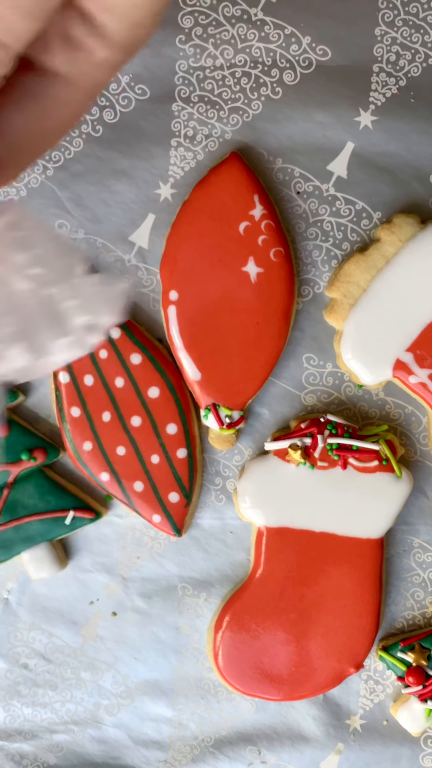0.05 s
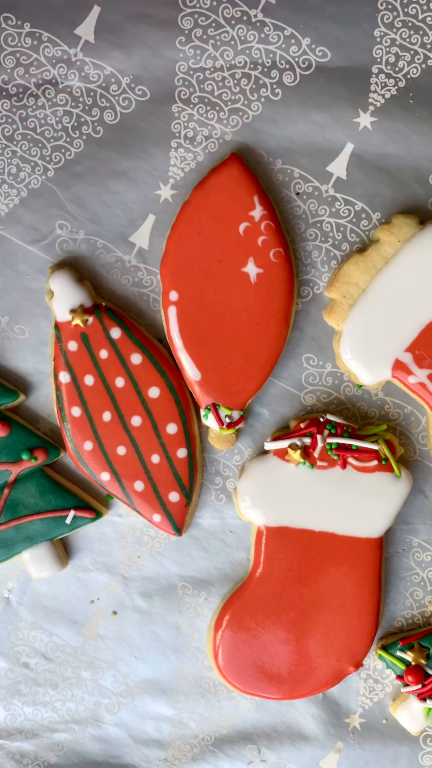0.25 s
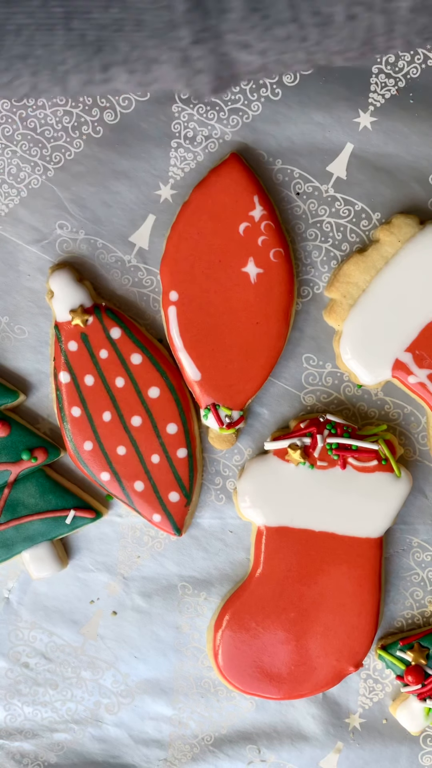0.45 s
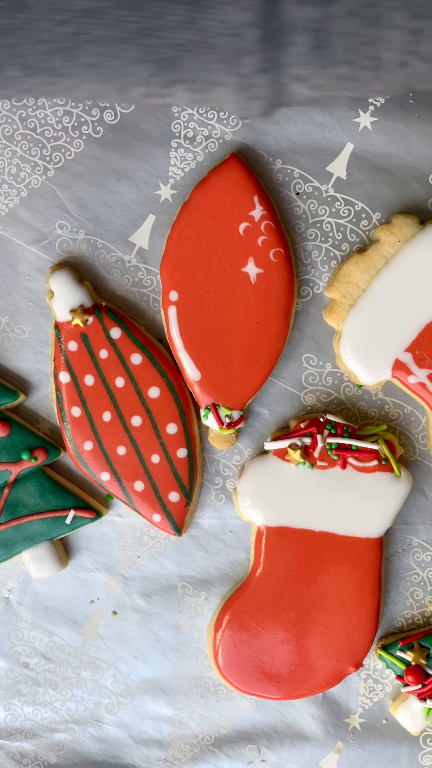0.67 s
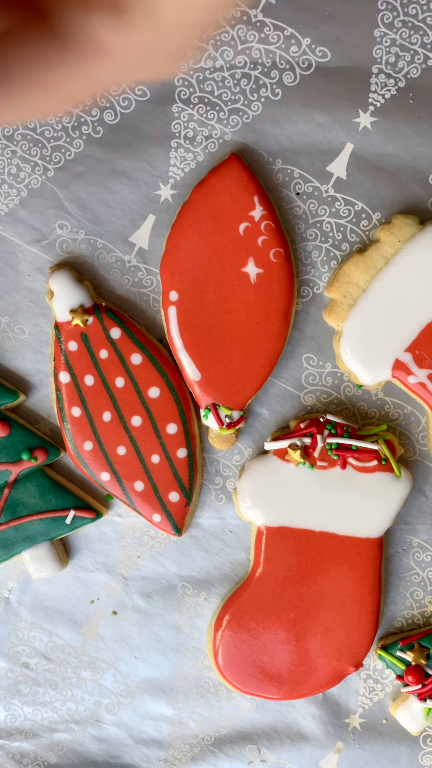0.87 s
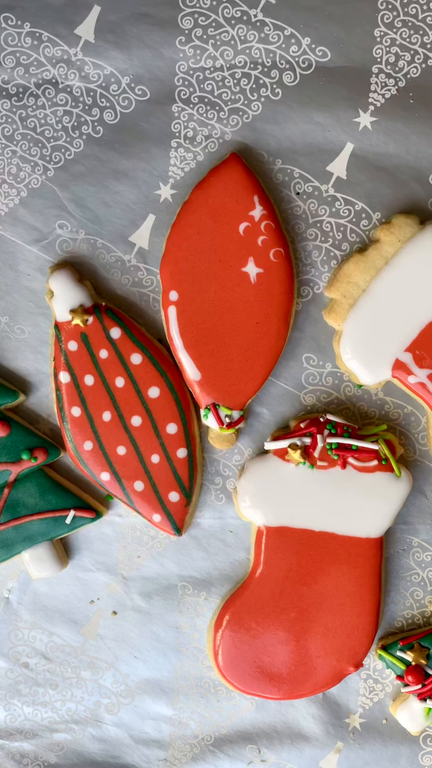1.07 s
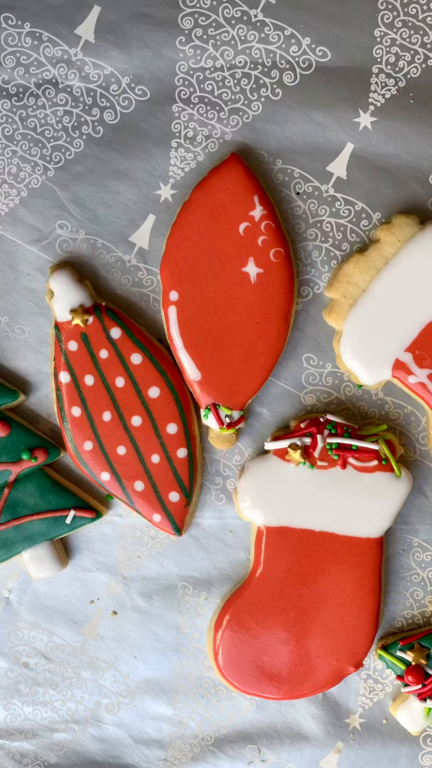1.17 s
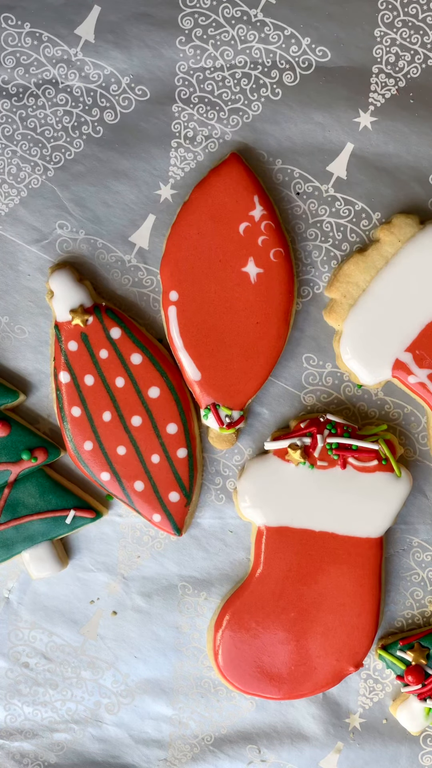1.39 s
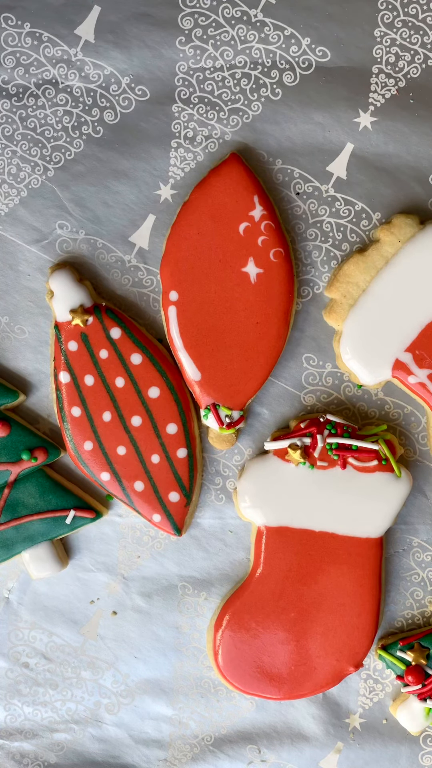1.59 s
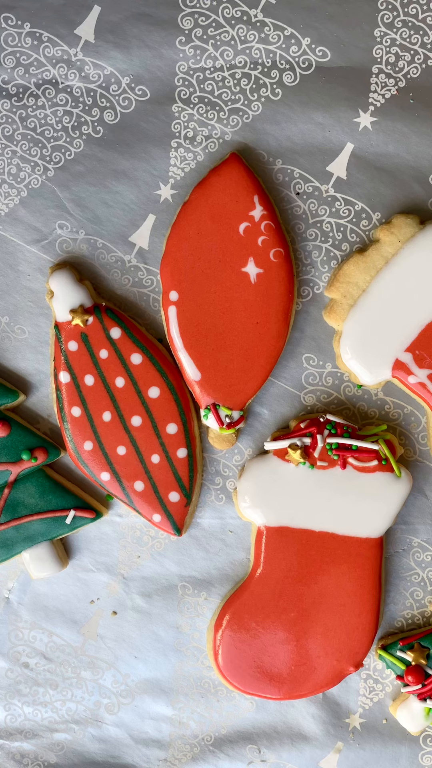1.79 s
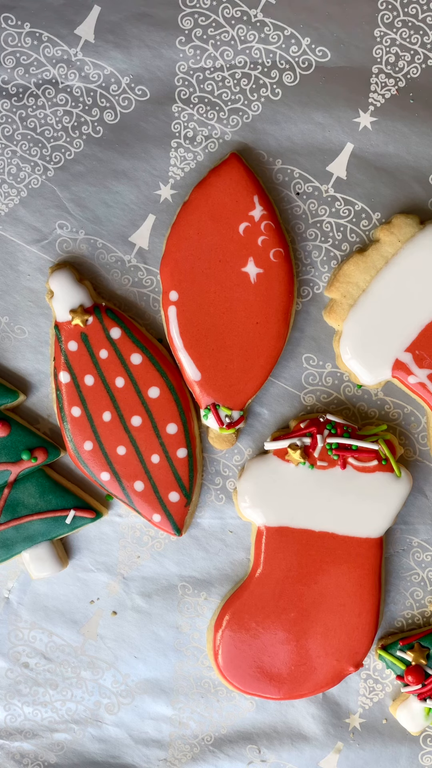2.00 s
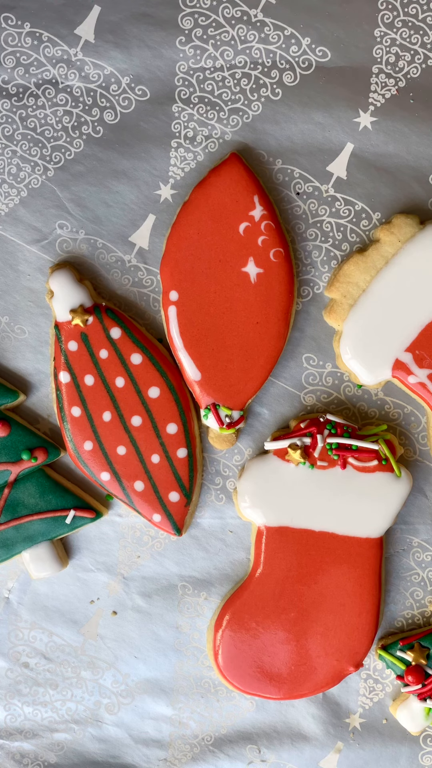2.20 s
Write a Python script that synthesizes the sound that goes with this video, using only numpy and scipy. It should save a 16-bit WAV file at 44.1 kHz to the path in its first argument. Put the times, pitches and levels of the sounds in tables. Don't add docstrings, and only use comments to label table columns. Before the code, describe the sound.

Close up in a small quiet indoor room, a bag lands with a woody thump, lighter knocks follow, something rubs softly on the board, and thin plastic crinkles increasingly, over a faint mains hum.

```python
import sys
import numpy as np
from scipy import signal
from scipy.fft import rfft, irfft
from scipy.io import wavfile
from scipy.ndimage import uniform_filter1d

SR = 44100
rng = np.random.default_rng(int(sys.argv[2]) if len(sys.argv) > 2 else 0)


def natural_amplitude(level_db):
    exponent = np.asarray(level_db, float) / 20
    return 10 ** exponent


def put_to_file(sound):
    columns = np.atleast_2d(sound).T
    safe = np.clip(columns, -1, 1)
    whole_steps = np.round(safe * 32767)
    wavfile.write(sys.argv[1], SR, whole_steps.astype(np.int16))


N = 99225

# [t/s, peak level/dB, bending-wave spread/ms]
KNOCKS = [
    (0.2462, -10, 1.67),
    (0.3745, -19, 1.93),
    (0.799, -21, 1.59),
]
# [f/Hz, level/dB, T60/s]
LANDING_MODES = [
    [(71.5, -7.5, 0.1), (126.5, 0, 0.074), (213, -13, 0.049), (297.4, -6, 0.048), (397, -3.5, 0.1),
     (384, -12, 0.038), (650, 0, 0.043), (890, 0, 0.035), (1235, 6, 0.012), (1474, -9, 0.03),
     (1826, -4, 0.014), (2140, -37, 0.0072)],
    [(81, -5.5, 0.34), (121.8, 0, 0.37), (133.8, -2, .2), (180, -12.5, 0.23), (253, -11.5, 0.34),
     (308, -4, 0.31), (430, -7, 0.08), (663.5, 8, 0.022), (909, 6.5, 0.028), (1286, 7, 0.01),
     (1597, 4, 0.006), (1917, -3.5, 0.025)],
    [(139.5, -2.5, 0.11), (310.4, 2.5, 0.1), (398, -7, 0.13), (580.5, 2, 0.066), (680, -3.5, 0.054),
     (732, 0.5, 0.018), (1064, 6, 0.017), (1330, -6, 0.025), (1666, -7.5, 0.021)],
]
# [f/Hz, width/Hz, level/dB]
BOARD_MODES = [(72.6, 20, -1.5), (128.8, 18, 1), (216, 20, -8), (293.6, 22, -4), (394.7, 34, -4),
               (591.5, 140, -2.5), (917, 390, -5.5), (1460, 340, -9.5)]
# [t/s, peak level/dB]
BUMPS = [(0.551, -34.5), (1.157, -47.5), (1.306, -40), (1.372, -60), (1.466, -50.5), (1.777, -44.5),
         (1.968, -44), (2.233, -54)]
# [start t/s, length/s, film level/dB, board level/dB, peak place/0-1]
MOVES = [(-.1, 1, -80, -60.5, 0.17), (0.23, .14, -72, -41, 0.44), (0.342, 0.44, -58, -49, 0.1),
         (0.47, 0.13, -58.5, -48, 0.4), (0.54, .16, -64, -51.5, 0.87), (0.681, 0.3, -66, -53, 0.53),
         (1.009, 0.039, -65, -78.5, 0.07), (1.076, 0.17, -57.5, -58.5, 1), (1.155, 0.037, -78, -53.5, 0.07),
         (1.224, 0.14, -48.5, -64, 0.56), (1.278, 0.036, -50, -45, 0.46), (1.345, 0.057, -50.5, -54, 0.2),
         (1.375, 0.14, -65.5, -55, 0), (1.46, .035, -73, -55.5, 0.4), (1.655, 0.12, -45, -50.5, 0.84),
         (1.766, 0.063, -37, -48.5, 0), (1.816, 0.062, -34.5, -48.5, 0.2), (1.86, 0.11, -43, -51, 0.27),
         (1.932, 0.032, -36, -57, 0.28), (1.95, 0.075, -32.5, -46.5, 0.3), (2.0, 0.11, -44.5, -68, 0.1),
         (2.076, 0.22, -53, -69.5, 0)]
# [start t/s, length/s, level/dB, from f/Hz, to f/Hz]
RUBS = [(0.487, 0.065, -56.5, 1670, 1370), (0.495, 0.18, -58, 703, 557), (0.613, 0.095, -52, 410, 404),
        (0.741, 0.041, -64, 1850, 2180), (1.094, 0.08, -65, 885, 920), (1.285, 0.037, -53.5, 1610, 1700),
        (1.276, 0.036, -54.5, 650, 567), (1.693, 0.14, -54.5, 1030, 1266)]
# [start t/s, length/s, level/dB, peak place/0-1]
RUMBLES = [(-.1, 0.29, -54, 0.45), (0.262, 0.068, -50.5, 0.1), (0.511, 0.13, -51, 0.33),
           (1.001, 0.14, -66, 0.27), (1.16, 0.11, -66, 0.2), (1.363, 0.044, -61.5, 0.7),
           (1.73, 0.073, -49, 0.96)]
# [f/Hz, level/dB]
FILM_COLOUR = [(200, -14), (700, -12), (2000, -3), (4200, -4.5), (6500, -4), (9800, -5), (14000, -19),
               (16300, -27)]
# [t/s, peak level/dB, centre f/Hz, tail/ms]
CRUMPLES = [(1.0143, -58, 2260, 3.0), (1.0615, -52, 2250, 2.3), (1.1182, -50, 1540, 3.1),
            (1.1967, -46, 2150, 3.0), (1.2811, -51, 3050, 3.0), (1.2975, -42, 1600, 3.0),
            (1.3594, -50, 1810, 2), (1.4039, -45.5, 1850, 6.4), (1.5169, -51, 2420, 5),
            (1.6571, -63.5, 4250, 3.0), (1.6701, -44, 2070, 4.1), (1.694, -36.5, 2580, 5),
            (1.7102, -33, 2380, 3.0), (1.73, -31.5, 2270, 4.2), (1.7485, -31, 2960, 2),
            (1.771, -23.5, 3440, 3.0), (1.7794, -22, 6300, 4), (1.8228, -21, 6000, 3.0),
            (1.8248, -30, 3570, 3.0), (1.837, -36, 2670, 2), (1.8811, -32, 4000, 5.4),
            (1.925, -33.5, 4000, 3.0), (1.9365, -40, 4680, 2.1), (1.958, -33, 1850, 2.1),
            (1.9604, -49.5, 3310, 4.2), (1.976, -38.5, 4400, 1.7), (1.9923, -31.5, 2730, 3.0),
            (2.0036, -34, 4120, 3.0), (2.0131, -30.5, 2160, 4.5), (2.0349, -29.5, 4160, 2.4),
            (2.0489, -29.5, 4030, 3.0), (2.0654, -35, 4000, 3.4), (2.0804, -34, 4060, 4.7),
            (2.098, -41.5, 5600, 1.6), (2.1149, -27.5, 6300, 3.0), (2.139, -45, 3300, 4.7),
            (2.156, -26.5, 6060, 2.4), (2.1804, -36, 6900, 3.4), (2.196, -47, 2230, 3.0),
            (2.2183, -44, 2830, 3.0), (2.2291, -29.5, 5900, 3.6)]
# [t/s, peak level/dB, centre f/Hz, ring/cycles]
SNAPS = [(.203, -48, 5000, 0.35), (.2425, -31.5, 3170, 2.3), (0.3719, -38.5, 3220, 0.54),
         (0.3741, -27.5, 4960, 0.5), (.416, -36.5, 2680, 0.32), (.677, -42.5, 2540, 0.91),
         (.69, -49.5, 1950, 2.7), (0.7822, -31, 2020, 3), (.792, -39, 2270, 4.3), (.8025, -46, 6000, 9.4),
         (.8739, -27.5, 5030, 0.2), (1.1084, -49, 4550, 1.1), (1.1547, -50.5, 2300, 3.0),
         (1.4148, -45.5, 2100, 1.8), (1.4421, -53, 1840, 2.7), (1.4616, -45.5, 2440, 2.4),
         (1.4916, -59, 2410, 3.8)]
# [f/Hz, T60/s]
ROOM_T60 = [(100, 0.31), (1500, 0.14), (12000, 0.42)]
# [f/Hz, level/dB]
ROOM_COLOUR = [(250, -12), (800, 0), (7000, -11), (10000, -19)]
# [f/Hz, level/dB]
AIR_COLOUR = [(55, -5.5), (80, -6.5), (150, -16.5), (400, -24), (1000, -34), (2500, -41), (8000, -53.5),
              (12000, -75)]
# [f/Hz, likeness/0-1]
AIR_LIKENESS = [(100, 1.0), (700, 0.18), (8000, 0.11)]
# [f/Hz, lead/rad]
LEFT_LEAD = [(100, 0), (700, -.7), (2500, .5), (4200, .5), (5100, 1.7), (7500, 2.3), (8300, 3.05),
             (11600, 3.3), (16500, 6.2)]


def evened(x):
    return x / np.sqrt(np.mean(x ** 2) + 1e-20)


def read(points, hz):
    f, value = np.transpose(points)
    return np.interp(np.log(hz + 1), np.log(f + 1), value)


def add(mix, start_s, sound):
    part = mix[round(start_s * SR):][:len(sound)]
    part += sound[:len(part)]


def colour(x, points):
    gain = natural_amplitude(read(points, np.fft.rfftfreq(2 * N, 1 / SR)))
    return irfft(rfft(x, 2 * N) * gain)[..., :N]


def resonate(x, hz, width_hz):
    turn = np.exp(2j * np.pi * np.cumsum(hz * np.ones(len(x))) / SR)
    r = np.exp(-np.pi * width_hz / SR)
    return 2 * (turn * signal.lfilter([1 - r], [1, -r], x / turn)).real


def wobble(size):
    smooth = uniform_filter1d(rng.standard_normal(N), size)
    return evened(uniform_filter1d(smooth, size))


def effort(moves, level_column):
    edge_db = -16
    t, power = np.arange(N) / SR, 0
    for move in moves:
        u = (t - move[0]) / move[1]
        peak = np.clip(move[4], .05, .95)
        away = np.where(u < peak, (peak - u) / peak, (u - peak) / (1 - peak))
        before_db = -60 * np.clip(-u * 15, 0, 1)
        power = power + natural_amplitude(move[level_column] + edge_db * away ** 2 + before_db) ** 2
    return np.sqrt(power)


def knock(peak_db, spread_ms, modes):
    after_db, after_t60_s = -21.5, .09
    t, ring = np.arange(0, .4, 1 / SR), 0
    for k, (hz, mode_db, t60_s) in enumerate(modes):
        delay_s = spread_ms / 1000 * (np.sqrt(2500 / hz) - 1)
        late = np.maximum(t - delay_s, 0)
        rise = np.minimum(late * hz * 1.2, 1)
        tone = natural_amplitude(mode_db - 60 * late / t60_s) * rise * np.sin(2 * np.pi * hz * late)
        ring = ring + (-1) ** k * tone
    hiss = evened(resonate(resonate(rng.standard_normal(len(t)), 650, 1800), 600, 1300))
    fade = natural_amplitude(after_db - 60 * t / after_t60_s) * np.minimum(t / 0.001, 1)
    return natural_amplitude(peak_db) * (ring / abs(ring).max() + fade * hiss)


def knocks():
    out = np.zeros(N)
    for (s, peak_db, spread_ms), modes in zip(KNOCKS, LANDING_MODES):
        add(out, s, knock(peak_db, spread_ms, modes))
    return out


def board(push, drift=0):
    out = 0
    for k, (hz, width_hz, db) in enumerate(BOARD_MODES):
        mode = resonate(push, hz * (1 + drift), width_hz) / np.sqrt(width_hz)
        out = out + (-1) ** k * natural_amplitude(db) * mode
    return out


def drag():
    t = np.arange(0, .0022, 1 / SR)
    bump = np.sin(np.pi * t / t[-1]) ** 2
    push, unit = np.zeros(N), np.zeros(N)
    for s, peak_db in BUMPS:
        add(push, s, natural_amplitude(peak_db) * bump)
    add(unit, 0, bump)
    bumps = board(push) / abs(board(unit)).max()
    friction = rng.standard_normal(N) * natural_amplitude(2.9 * wobble(size=300))
    rub = evened(board(friction, drift=.05 * wobble(size=1500)))
    return rub * effort(MOVES, level_column=3) + bumps


def rubs():
    lump_db, relative_width = 3.5, 0.14
    out = np.zeros(N)
    lumps = rng.standard_normal(N) * natural_amplitude(lump_db * wobble(size=200))
    for s, length_s, db, from_hz, to_hz in RUBS:
        u = np.linspace(0, 1, round(length_s * SR))
        hz, width_hz = from_hz + (to_hz - from_hz) * u, from_hz * relative_width
        part = lumps[round(s * SR):][:len(u)]
        stroke = evened(resonate(resonate(part, hz, width_hz), hz, width_hz))
        add(out, s, natural_amplitude(db) * np.sin(np.pi * u) * stroke)
    return out


def rumble():
    centre_hz, width_hz, lump_db = 159, 200, -0.5
    lumps = rng.standard_normal(N) * natural_amplitude(lump_db * wobble(size=500))
    low = resonate(resonate(lumps, centre_hz, width_hz), centre_hz, width_hz)
    moves = [(s, length_s, db, db, peak) for s, length_s, db, peak in RUMBLES]
    return evened(low) * effort(moves, level_column=2)


def rustle():
    creases_per_s, crease_spread_db, clump_db, slide_share = 3000, 3.7, 1.9, .48
    dull_hz, dull_below_db, dull_share = 4260, -53.5, 0.1
    clump = natural_amplitude(clump_db * wobble(size=130))
    size = natural_amplitude(crease_spread_db * np.minimum(rng.exponential(1, N), 4))
    size = size * (rng.random(N) < creases_per_s / SR)
    kind, creases = rng.integers(0, 24, N), np.zeros(N)
    t = np.arange(600) / SR
    for k, hz in enumerate(np.geomspace(500, 15000, 24)):
        grain = np.sin(2 * np.pi * hz * t) * np.exp(-t * hz / 2.2) * hz
        creases += signal.oaconvolve(size * (kind == k), grain)[:N]
    mix = (1 - slide_share) * evened(creases) + slide_share * rng.standard_normal(N)
    film = evened(colour(mix * clump, FILM_COLOUR))
    gain = effort(MOVES, level_column=2)
    low = signal.sosfiltfilt(signal.butter(2, dull_hz, fs=SR, output="sos"), film)
    bright = np.minimum(gain / natural_amplitude(dull_below_db), 1) ** dull_share
    return (low + bright * (film - low)) * gain


def crumples():
    ring_db, relative_width, rise_s, crest_db = 1.5, 0.1, 0.00037, -9.5
    out, t = np.zeros(N), np.arange(1500) / SR
    noise = rng.standard_normal((len(CRUMPLES), 1500))
    shape = natural_amplitude(read(FILM_COLOUR, np.fft.rfftfreq(1500, 1 / SR)))
    for (s, peak_db, hz, tail_ms), v in zip(CRUMPLES, noise):
        ring = evened(resonate(v[::-1], hz, hz * relative_width))
        burst = evened(irfft(rfft(v) * shape, 1500)) + natural_amplitude(ring_db) * ring
        envelope = np.minimum(t / rise_s, 1) * np.exp(-t * 1000 / max(tail_ms, .5))
        add(out, s, natural_amplitude(peak_db + crest_db) * burst * envelope)
    return out


def snaps():
    crack_db, crack_tail_s = -4, .002
    out, t = np.zeros(N), np.arange(800) / SR
    noise = rng.standard_normal((len(SNAPS), 800))
    cracks = signal.lfilter([1, -1], [1, -1.1, .45], noise, axis=1) / 2
    for (s, peak_db, hz, cycles), crack in zip(SNAPS, cracks):
        u = t * hz / max(cycles, .5)
        ring = np.sin(2 * np.pi * hz * t) * u * np.exp(1 - u * 2) * 2
        add(out, s, natural_amplitude(peak_db) * (ring + natural_amplitude(crack_db) * crack * np.exp(-t / crack_tail_s)))
    return out


def room(x):
    taps = np.zeros((2, 16000))
    at = np.arange(100, 15980, 20) + rng.integers(0, 20, (2, 794))
    np.put_along_axis(taps, at, rng.choice([-1., 1.], at.shape), 1)
    hz, t, z = signal.stft(taps, SR, nperseg=256)
    z[1, :4] = z[0, :4]
    decay_db = read(ROOM_COLOUR, hz)[:, None] - 60 * t / read(ROOM_T60, hz)[:, None]
    tail = signal.istft(z * natural_amplitude(decay_db), SR, nperseg=256)[1]
    return signal.fftconvolve(x[None], tail / np.linalg.norm(tail[0]), axes=1)[:, :N]


def air():
    left, other = rng.standard_normal((2, N))
    same = np.clip(read(AIR_LIKENESS, np.fft.rfftfreq(N, 1 / SR)), 0, 1)
    right = irfft(same * rfft(left) + np.sqrt(1 - same ** 2) * rfft(other), N)
    return natural_amplitude(-63.5) * evened(colour(np.array([left, right]), AIR_COLOUR))


def hum():
    hz = 49.5 + .9 * wobble(size=4000)
    level_db = -54.5 + 1.6 * wobble(size=3000)
    return np.sin(2 * np.pi * np.cumsum(hz) / SR) * natural_amplitude(level_db)


def scene():
    near = knocks() + drag() + rubs() + rumble() + rustle() + crumples() + snaps()
    room_db = -15
    return near + natural_amplitude(room_db) * room(near) + air() + hum()


def roll_off(x):
    return signal.sosfilt(signal.butter(12, 16640, fs=SR, output="sos"), x)


def record(dry):
    low_cut_hz, top_cut_hz = 39.7, 15950
    hz = np.fft.rfftfreq(2 * N, 1 / SR)
    f, lead_rad = np.transpose(LEFT_LEAD)
    turn = np.exp(.5j * np.interp(hz, f, lead_rad) * np.array([[1], [-1]]))
    low_cut = hz ** 4 / (hz ** 4 + low_cut_hz ** 4)
    top_cut = 1 / (1 + (hz / top_cut_hz) ** 120)
    mix = irfft(rfft(dry, 2 * N) * turn * low_cut * top_cut)[:, :N]
    return roll_off(mix)


dry = scene()
out = record(dry)
put_to_file(out)
```